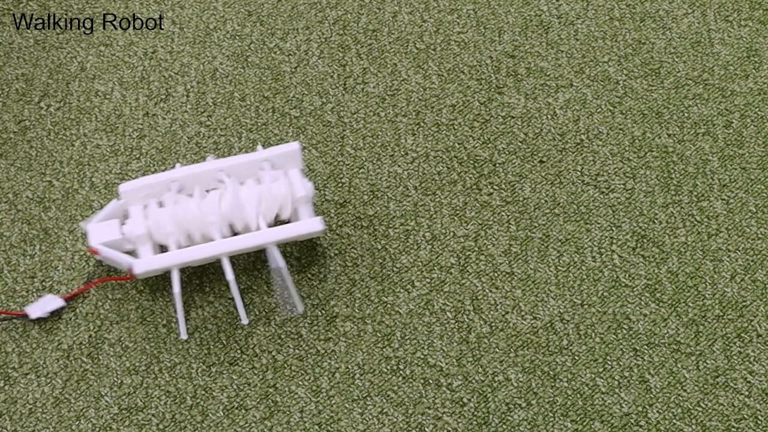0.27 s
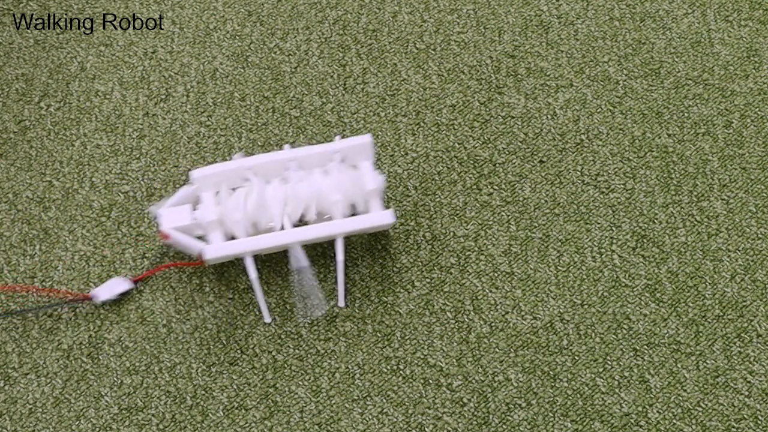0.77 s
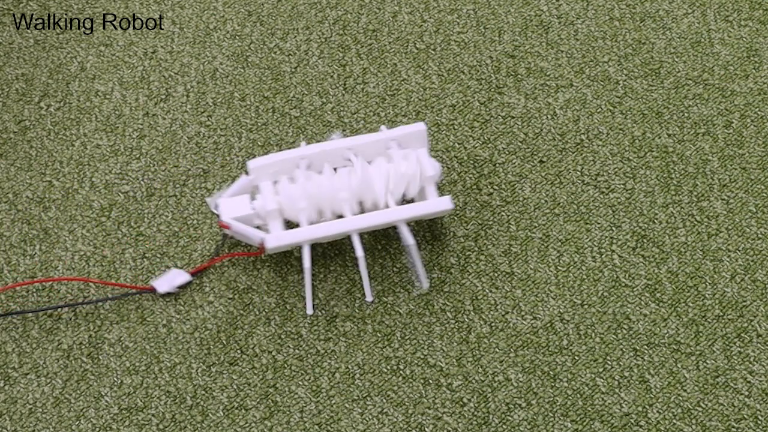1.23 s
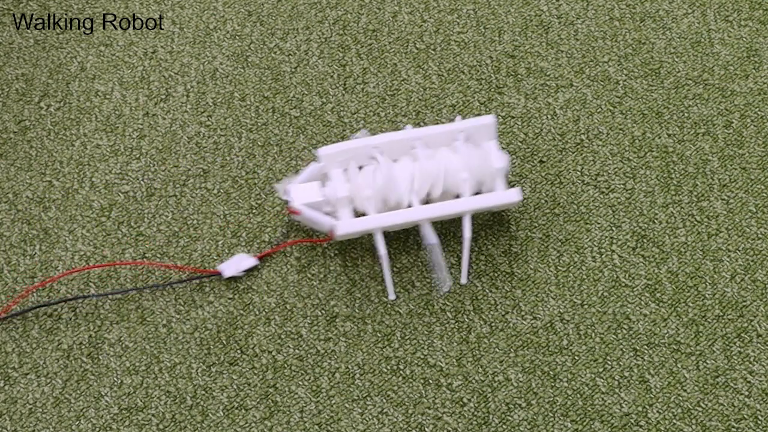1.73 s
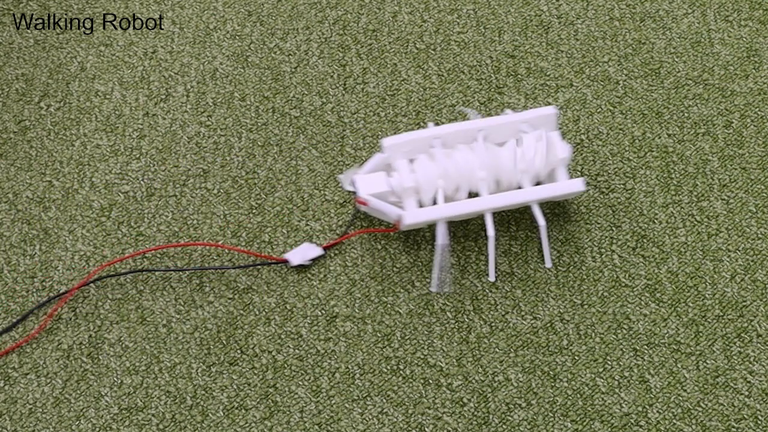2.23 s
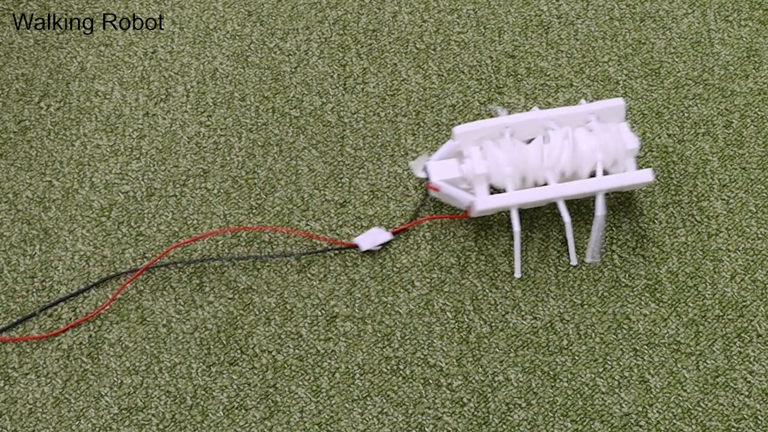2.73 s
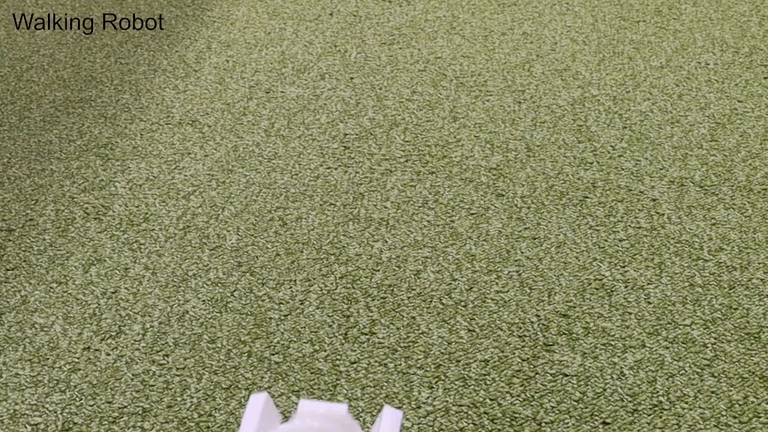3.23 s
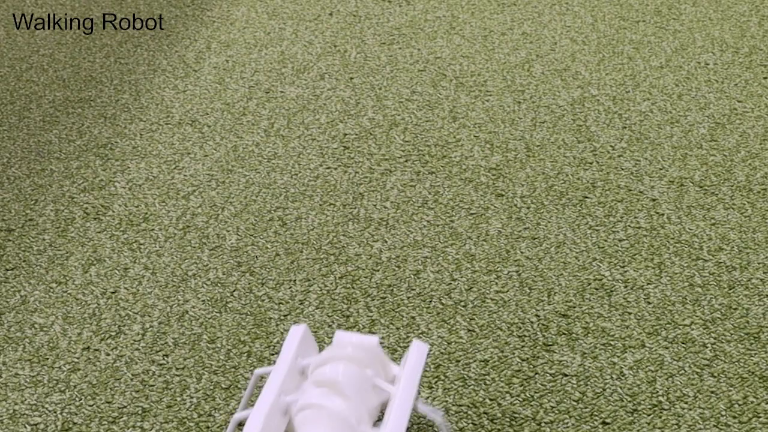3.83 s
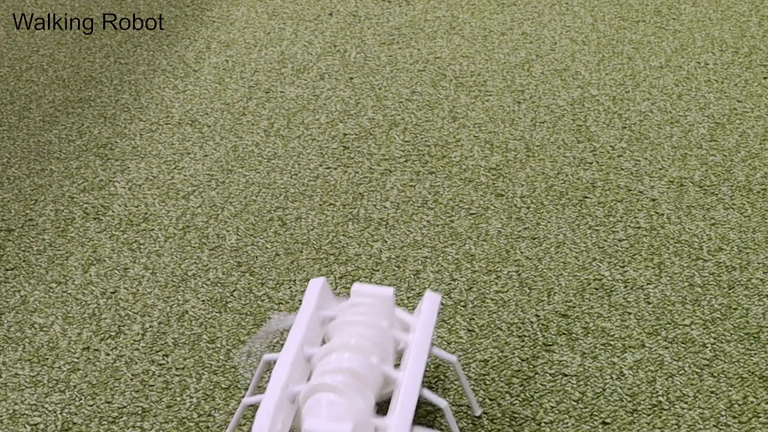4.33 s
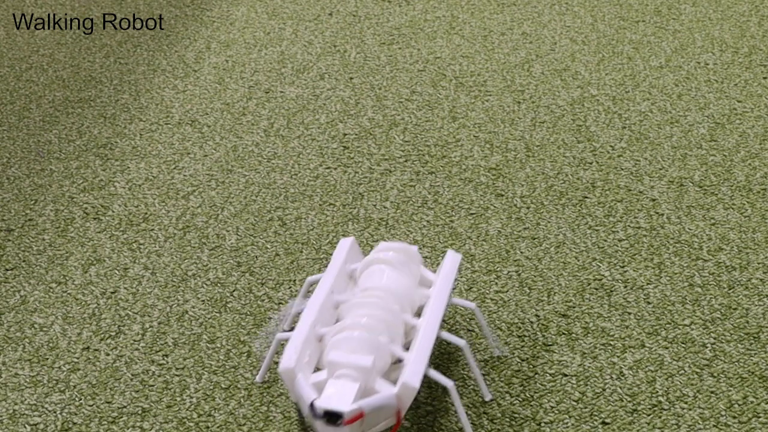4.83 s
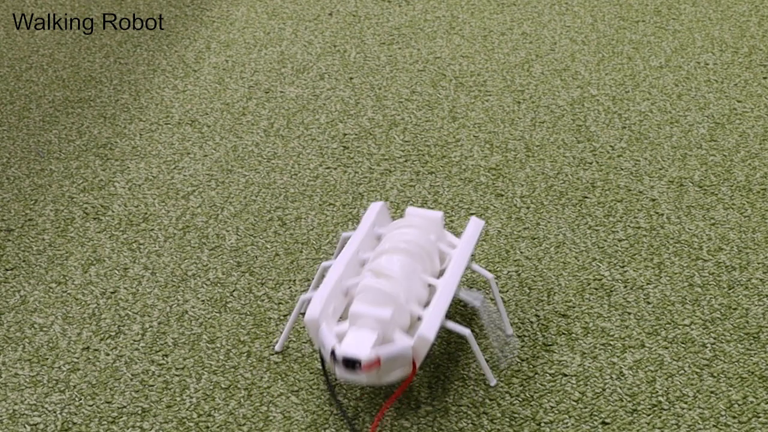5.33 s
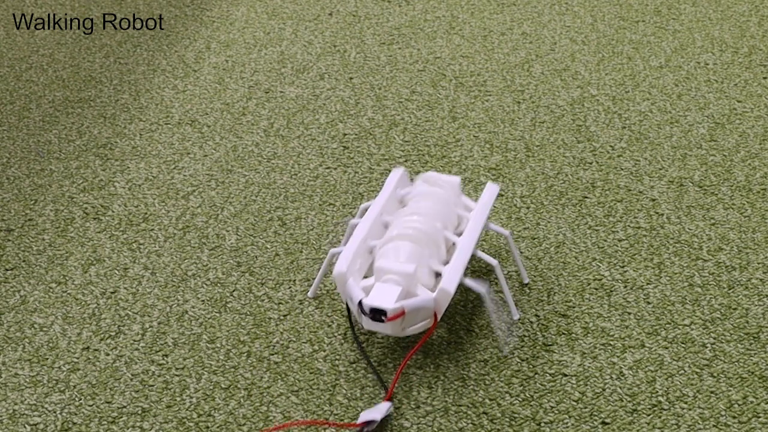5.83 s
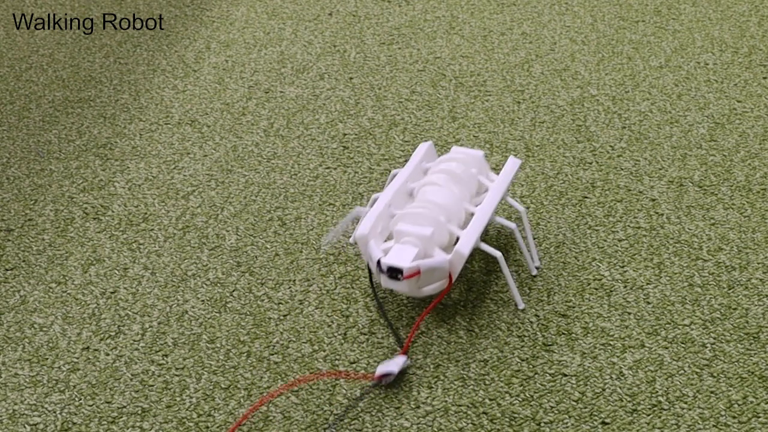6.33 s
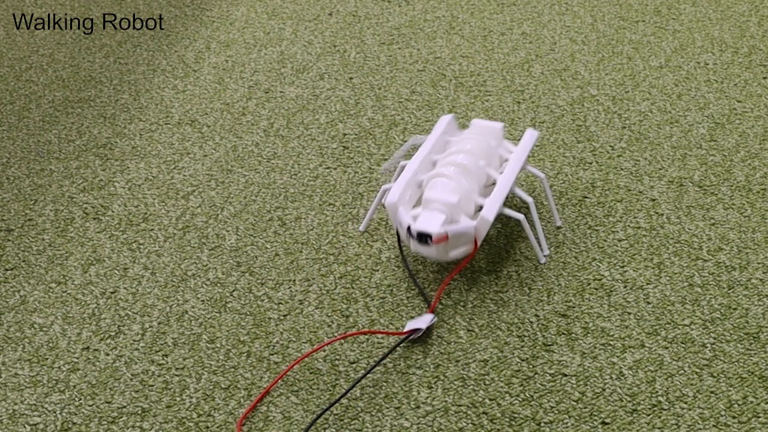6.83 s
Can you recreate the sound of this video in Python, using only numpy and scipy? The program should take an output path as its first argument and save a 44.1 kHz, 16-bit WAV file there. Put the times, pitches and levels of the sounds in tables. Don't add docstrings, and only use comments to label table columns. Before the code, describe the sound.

Rapid plastic clatter and a shrill gear whine pulse about three times a second in a quiet carpeted room, jumping louder midway.

```python
import sys
import numpy as np
from scipy import signal
from scipy.fft import rfft, irfft
from scipy.io import wavfile
from scipy.ndimage import uniform_filter1d, map_coordinates

SR = 44100
rng = np.random.default_rng(int(sys.argv[2]) if len(sys.argv) > 2 else 0)


def store_pcm(level_fs):
    pcm = np.round(np.clip(level_fs, -1, 1) * 32767).astype(np.int16)
    wavfile.write(sys.argv[1], SR, np.atleast_2d(pcm).T)


def elevation(decibels):
    levels = np.asarray(decibels, float)
    return 10 ** (levels / 20)


N = 312669
CHANGE_S = 3.013


def level(x, db):
    return x * elevation(db) / np.sqrt(np.mean(x ** 2))


def colour(x, points, lo_hz, hi_hz):
    hz = np.maximum(np.fft.rfftfreq(4096, 1 / SR), 5.)
    at_hz, db = np.transpose(points)
    edges = 1 / np.sqrt((1 + (lo_hz / hz) ** 8) * (1 + (hz / hi_hz) ** 8))
    gain = elevation(np.interp(np.log(hz), np.log(at_hz), db)) * edges
    cepstrum = irfft(np.log(gain + 1e-5))
    cepstrum[1:2048] *= 2
    cepstrum[2049:] = 0
    return signal.fftconvolve(x, irfft(np.exp(rfft(cepstrum))))[:N]


def band(x, hz, width_hz):
    edges_hz = [hz - width_hz / 2, hz + width_hz / 2]
    return level(signal.sosfilt(signal.butter(2, edges_hz, "band", fs=SR, output="sos"), x), 0)


def wander(rate):
    hold = max(int(SR / rate), 21)
    steps = rng.standard_normal(N // 20)[np.arange(N) // hold]
    return level(uniform_filter1d(uniform_filter1d(steps, hold), hold), 0)


def bump(place, share, length):
    away = (place - share + .5) % 1 - .5
    return np.exp(-(away / (length / 2)) ** 4)


def swells(place, events):
    return sum(np.outer(db, bump(place, at, length)) for at, length, *db in events)


def air():
    # (frequency [Hz], level per Hz [dB])
    rumble = [(15, -46), (25, -19), (69, -14), (96, -14.5), (130, -16.5), (186, -9), (355, -4), (452, -9),
              (549, -2.5), (900, -6), (1170, -10), (1980, -120)]
    # (frequency [Hz], level [dB], change in the rear view [dB])
    hums = [
        (48.5, -71.5, 1.5),
        (101, -65, 2),
        (189, -59, -9),
        (256.5, -60, -34),
    ]
    rumble_db = -47
    t = np.arange(N) / SR
    mid, side = (colour(rng.standard_normal(N), rumble, 15, 1070) for _ in range(2))
    side = colour(side, [(25, -14), (50, -10), (100, 7), (250, -3.0), (700, 2.5)], 10, 2000)
    hum = 0
    for hz, db, later_db in hums:
        hum_db = db + 1.5 + later_db * (t > CHANGE_S) + 0.69 * wander(5.13)
        hum = hum + elevation(hum_db) * np.sin(2 * np.pi * hz * t + 0.28 * wander(4.5))
    return level(mid, rumble_db) + hum + level(side, rumble_db - 8.0) * np.array([[1], [-1]])


def room(x):
    t60_s, room_db = .07, -3
    t = np.arange(SR // 3) / SR
    decay = np.exp(-np.log(1000) * t / t60_s)
    tail = rng.standard_normal((2, len(t))) * decay * (t > .0003)
    tail = tail / np.sqrt(np.sum(tail ** 2, axis=1, keepdims=True))
    paths = [map_coordinates(x, [np.arange(N) - 70 - 24 * wander(4)], order=3) for _ in range(2)]
    return elevation(room_db) * signal.fftconvolve(np.array(paths), tail, axes=1)[:, :N]


def knocks():
    # (time [s], peak level [dB], ring frequency [Hz])
    hits = [(0.3621, -15, 2890), (0.6448, -13, 3520), (0.6807, -24, 3650), (0.9941, -14, 3640),
            (1.1159, -11, 5600), (1.3099, -22, 3120), (1.6247, -20, 2990), (1.7075, -13, 3480),
            (1.7918, -19, 4070), (2.023, -13, 2830), (2.8898, -28, 1460), (2.9207, -30, 4060),
            (3.0145, -25, 1460), (3.05, -11, 3660), (3.1278, -16, 3520), (3.1746, -7, 5500),
            (3.213, -10, 4180), (3.322, -12, 2620), (3.4408, -6, 4230), (3.48, -6, 3530),
            (3.5023, -15, 4170), (3.5443, -8, 5500), (3.5987, -6, 2650), (3.6336, -5, 2520),
            (3.6745, -22, 2440), (3.8367, -11, 4200), (3.9868, -25, 1410), (4.0683, -11, 1490),
            (4.127, -22, 4100), (4.1976, -21, 5430), (4.3545, -21, 2620), (4.4242, -7, 3710),
            (4.5346, -19, 3120), (4.5705, -22, 2640), (4.6153, -10, 4070), (4.6907, -4, 3400),
            (4.7172, -16, 4150), (4.7496, -15, 3940), (4.775, -7, 4130), (4.8469, -9, 2760),
            (4.883, -18, 2560), (4.9262, -10, 3670), (5.008, -9, 1470), (5.0634, -13, 4000),
            (5.1602, -11, 3080), (5.1975, -11, 2640), (5.239, -10, 3600), (5.3794, -17, 4200),
            (5.471, -15, 2980), (5.6914, -17, 4050), (5.7144, -7, 4130), (5.8202, -22, 2760),
            (6.028, -15, 4190), (6.0831, -19, 4380), (6.1005, -17, 4200), (6.2542, -17, 1500),
            (6.4901, -16, 1470), (6.6009, -15, 4210), (6.7241, -18, 2670), (6.928, -8, 4160)]
    knock_db, ring_s = -5.5, .0025
    crack_db, crack_s = -1, .0007
    at_s, db, hz = np.transpose(hits)[:, :, None]
    t = np.arange(512) / SR
    crack = rng.standard_normal((len(hits), len(t))) * np.exp(-t / crack_s)
    ring = np.sin(2 * np.pi * hz * t) * np.exp(-t / ring_s)
    out = np.zeros(N + len(t))
    places = (at_s * SR).astype(int) + np.arange(len(t))
    np.add.at(out, places, elevation(db + knock_db) * (ring + elevation(crack_db) * crack))
    return signal.sosfilt(signal.butter(3, [1050, 10000], "band", fs=SR, output="sos"), out[:N])


def snaps(table, turn_s, first_s):
    share, db = np.transpose(table)
    turns = np.arange(-1, N / SR / turn_s)[:, None]
    late, harder = rng.standard_normal((2, len(turns), len(share)))
    at = ((first_s + (turns + share) * turn_s + 0.0014 * late) * SR).astype(int)
    inside = (at >= 0) & (at < N)
    blows = np.zeros(N)
    blows[at[inside]] = elevation(db + 1.5 * harder)[inside]
    decay = np.exp(-1 / (0.0012 * SR))
    return signal.lfilter([1], [1, -decay], blows) * rng.standard_normal(N) / 3


def rattle(body, rings, blows, frame_db, cam_db, slide_db, leg_db, fine_db):
    happens, sign, size = rng.random((N, 3)).T
    size_db = np.minimum(-3.0 * np.log(size + 1e-9), 10)
    ticks = (happens < 1200 / SR) * np.sign(sign - .5) * elevation(size_db)
    judder = elevation(np.clip(1.6 * wander(90), -4, 4))
    ticks = level(ticks, 0) * judder + blows
    # (level [dB], low edge [Hz], high edge [Hz], rubbing against ticks [dB])
    regions = (
        (0.55 * frame_db, 900, 1900, -1.5),
        (0.47 * cam_db, 1900, 4500, -1.5),
        (slide_db, 4500, 9800, 1.5),
        (leg_db, 9800, 13400, .6),
        (fine_db, 13400, 17000, .6),
    )
    out = 0
    for db, lo_hz, hi_hz, rub_db in regions:
        rub = elevation(rub_db) * judder * rng.standard_normal(N)
        out = out + colour((ticks + rub) * elevation(db + .4 * wander(20)), body, lo_hz, hi_hz)
    for hz, width_hz, db, frame, cam, leg in rings:
        shaken = ticks + 1.2 * judder * rng.standard_normal(N)
        shake_db = frame * frame_db + cam * cam_db + leg * leg_db
        out = out + elevation(db) * band(shaken * elevation(shake_db), hz, width_hz)
    return out


def whine(tooth_hz, first_db, second_db, third_db, shell_db, beat_db, rough):
    wheel_teeth = 35
    beat = .268
    teeth = np.cumsum(tooth_hz * (1 + .004 * wander(40) + .007 * wander(500))) / SR
    wheel = 2 * np.pi * teeth / wheel_teeth + 0.087 * wander(41)
    swell = np.sin(wheel) - 0.75 * np.sin(2 * wheel)
    # (multiple of the tooth rate, level [dB], throb depth, grit)
    orders = (
        (1, first_db + 3.7, .15, .3),
        (2, second_db + 2.5, .35, .2 * rough),
        (3, third_db + 3.5, .6, .4),
        (4, third_db - 20, .6, .9),
        (2 + beat, second_db + beat_db[0], .4, .4 * rough),
        (3 - beat, third_db + beat_db[1], .5, .6),
        (3 + beat, third_db + beat_db[2], .5, .5),
    )
    out = elevation(shell_db + 0.5) * band(rng.standard_normal(N), 5430, 390)
    for order, db, depth, grit in orders:
        throb = 1 + depth * swell + .2 * wander(200) + grit * wander(1500)
        out = out + elevation(db + 0.57 * wander(25.11)) * throb * np.sin(2 * np.pi * order * teeth)
    return out


def two_ports(direct, pan_db, lag):
    low, under = (signal.sosfiltfilt(signal.butter(2, hz, fs=SR, output="sos"), direct) for hz in (3400, 10000))
    # (band, share of the bearing, lean to the left [dB])
    bands = ((low, .1, -2), (under - low, .6, -.3), (direct - under, 1.3, 0.7))
    ports = []
    for side in (1, -1):
        heard = sum(elevation(side * (share * pan_db + lean_db)) * x for x, share, lean_db in bands)
        ports.append(map_coordinates(heard, [np.arange(N) - side * lag / 2], order=3))
    return np.array(ports)


def robot(tones_db, shell_swell_db, grit, mesh, shake, walk, bearing, body, snap, turn_s, first_s,
          rattle_db, rings, speed, slides, beat, beat_db, octave_db):
    free_hz, stall_hz = 4300, 3770
    wet_share = 0.29
    t = np.arange(N) / SR
    place = np.arange(720) / 720
    first, second, shell = tones_db

    tooth_hz = np.interp(place, *np.transpose(speed), period=1)
    load = (free_hz - tooth_hz) / (free_hz - stall_hz)
    first, second, third = np.array([[first], [second], [-40]]) + swells(place, mesh)
    frame, cam, leg = np.array([[-3.1], [-3.1], [-3]]) + swells(place, shake)
    third = third + 14.5 * load
    landing = 4.2 * bump(place, 0.93, 0.038)
    leg = leg + 5 * load + landing
    slide = -2.5 + swells(place, slides)[0]
    shell = shell + shell_swell_db * bump(place, 0.59, 0.43)
    upper = beat_db[0] + swells(place, beat)[0]

    curves = (tooth_hz, first, second, third, shell, frame, cam, slide, leg, upper, load)
    every_turn = [np.interp((t - first_s) / turn_s, place, curve, period=1) for curve in curves]
    tooth_hz, first, second, third, shell, frame, cam, slide, leg, upper, load = every_turn

    (nearest_s, span_s), *beams = walk
    loss_db = 10 * np.log10(1 + ((t - nearest_s) / span_s) ** 2)
    mid_db, top_db, near_db, fine_db, twice_db = (db - share * loss_db for db, share in beams)

    beats = (upper, beat_db[1] - 8 * load, beat_db[2])
    tones = whine(tooth_hz, first + near_db, second + twice_db + octave_db, third + top_db,
                  shell + near_db, beats, grit)
    parts = rattle(body, rings, snaps(snap, turn_s, first_s), frame, cam,
                   slide_db=1.26 * slide + mid_db - near_db,
                   leg_db=0.57 * leg + top_db - near_db,
                   fine_db=1.4 * leg + fine_db - near_db)
    direct = tones + elevation(rattle_db + near_db) * parts
    pan_db = bearing[0] + bearing[1] * (t - first_s)
    lag = bearing[2] + bearing[3] * (t - first_s)
    return two_ports(direct, pan_db, lag) + room(direct * elevation(wet_share * loss_db))


def side_view():
    # (frequency [Hz], level per Hz [dB])
    body = [(410, -45), (700, -7), (1150, -4.5), (1520, -1), (1810, -3.5), (2880, -1), (3500, 0),
            (4090, -1.5), (4800, -3.5), (5810, -2), (8250, 1), (9300, -4), (10200, -1), (12500, 2),
            (14100, -7.5), (15600, -15)]
    # (share of turn, tooth rate [Hz])
    speed = [(.0, 3735), (.035, 4024), (.1, 3972), (.14, 4187), (.19, 4074), (.25, 4212), (.35, 4281),
             (.41, 4074), (.5, 4152), (.58, 4108), (.65, 4117), (.685, 4242), (.74, 4093), (.79, 4036),
             (.825, 3747), (.88, 3725), (.95, 3847), (.985, 3716)]
    # (share of turn, length share, tooth tone [dB], second [dB], third [dB])
    mesh = [(.07, 0.05, 1, 8, 4), (0.161, 0.042, -5, 10, -3), (.22, 0.072, 0.5, 3, 0),
            (.31, 0.09, 3, 5, -16), (.39, 0.081, 6.5, 10.5, 1), (.54, 0.23, 5.5, 8.5, 6.5),
            (.75, 0.15, 5, 7, 11.5), (.89, 0.24, 3.5, 5.5, 2.5), (.01, 0.065, -1, -23, -12)]
    # (share of turn, length share, frame [dB], cam [dB], leg scratch [dB])
    shake = [(.01, 0.031, 4, -2.5, -6), (.05, 0.12, 2, 3.5, 4), (.12, .04, 0, 2, -5),
             (.15, 0.041, 4, 5.5, 6), (.23, 0.09, 2, 5.5, -1.5), (.31, 0.055, 1.5, -3, 5),
             (.47, 0.056, -3, -0.5, -2), (.6, 0.12, -4, -1, -1.5), (.75, 0.12, 2.5, 1, 2.5),
             (.84, 0.062, 6.5, 8, 4), (.95, 0.088, 6, 6, 2.5), (.39, .03, 1, -4, 6),
             (.485, .02, -2, 2.5, 9), (.535, .02, -5, -2, 7.5), (.585, .02, 6.5, 3, -1.5),
             (.44, .04, -4, -1.5, -3), (.69, .04, 3, -7.5, 3)]
    # (share of turn, level [dB])
    snap = [(.005, 13), (.125, 11), (.16, 14), (.205, 14), (.22, 13), (.4, 10), (.475, 11), (.52, 10),
            (.7, 12), (.725, 11), (.81, 13), (.845, 14), (.955, 16)]
    # (share of turn, length share, level [dB])
    slides = [(.0, 0.024, 6), (.055, 0.076, 3), (.16, .04, 0.5), (.4, 0.44, 2.5), (.6, .1, 2.5),
              (.85, 0.063, -1.5), (.97, 0.025, 2)]
    # (share of turn, length share, level [dB])
    beat = [(.05, .06, 5), (.4, .05, -4.5), (.55, .15, 3), (.88, .2, -1.5)]
    # (frequency [Hz], width [Hz], level [dB], share of frame shake, of cam shake, of leg scratch)
    rings = [
        (1505, 240, -24, 1, 0.59, 0),
        (1320, 160, -41, 0.9, 0, 0),
        (2890, 190, -28, 0, 1.5, 0.25),
        (3520, 380, -29, 0.42, 1.4, 0),
    ]
    # (level nearest [dB], share of loss)
    walk = [
        (2.64, 1.2),
        (0.76, 0.37),
        (0.4, 1.03),
        (1.16, 0.033),
        (1.6, 0.21),
        (2.4, 0.88),
    ]
    bearing = (4, -2, -1.71, 1.32)
    return robot((-42.5, -37, -53), 8.5, 1.4, mesh, shake, walk, bearing, body, snap,
                 turn_s=.31637, first_s=.06, rattle_db=-23.5, rings=rings, speed=speed, slides=slides,
                 beat=beat, beat_db=(-8, -6, -5.5), octave_db=1.0)


def rear_view():
    # (frequency [Hz], level per Hz [dB])
    body = [(410, -46), (700, -6), (980, -10.5), (1350, 1), (1950, -3), (2700, 0), (3400, -1), (4150, -1.5),
            (4800, -5), (6100, -9.5), (7000, -5), (9000, -6.5), (10500, -3.5), (12600, -3), (14200, -10.5),
            (15600, -18.5)]
    # (share of turn, tooth rate [Hz])
    speed = [(.01, 3640), (.04, 4093), (.11, 4055), (.155, 4168), (.2, 4080), (.28, 4330), (.36, 4350),
             (.41, 4108), (.46, 4195), (.57, 4190), (.66, 4343), (.73, 4190), (.78, 4113), (.825, 3803),
             (.89, 3797), (.96, 3849), (.985, 3686)]
    # (share of turn, length share, tooth tone [dB], second [dB], third [dB])
    mesh = [(.07, 0.028, 1.5, -0.5, 6.5), (.165, 0.035, 8, -7, 8.5), (.225, 0.058, 8.5, 2, -9),
            (.32, .1, 2, 5.5, -4), (0.402, 0.064, 10.5, 6, 3), (.47, 0.053, 3.5, -1, 1),
            (.52, .17, 6, 4.5, 5), (.73, 0.22, 5.5, 0.5, 2), (.89, 0.27, 0, 3.5, 1.5),
            (.01, 0.032, -7, -4, -29)]
    # (share of turn, length share, frame [dB], cam [dB], leg scratch [dB])
    shake = [(.01, 0.054, 6, 6.5, -11), (.05, 0.18, -0.5, -2, -0.5), (.115, .035, 2, 1.5, -2.5),
             (.15, 0.029, 2, 5, 3.5), (0.217, 0.055, 5.5, 7.5, -3.5), (.31, .08, -1.5, 2.5, 4.5),
             (.38, 0.052, -2.5, -7, 3.5), (.45, 0.11, 0.5, 2.5, 4.5), (.54, 0.12, -1.5, 4, 0.5),
             (.64, 0.028, 5, 5.5, 7.5), (0.732, 0.1, 3.5, 6, -0.5), (0.829, 0.078, 8.5, 10, 1.5),
             (.93, .1, 3.5, 6, 0.5), (.395, .035, -2, 0.5, 3.5), (.485, 0.022, 6.5, -3.5, -2),
             (.53, .02, 1, 1, 4), (.58, .02, -1, -6.5, 5.5), (.445, 0.034, -8.5, -4.5, -13),
             (.74, 0.11, 2.5, 1.5, 6.5)]
    # (share of turn, level [dB])
    snap = [(.05, 10), (.125, 11), (.148, 11), (.195, 15), (.208, 15), (.245, 13), (.35, 11), (.38, 12),
            (.466, 14), (.52, 11), (.56, 10), (.594, 10), (.698, 16), (.75, 14), (.786, 12), (.814, 16),
            (.84, 15), (.95, 16), (.975, 13)]
    # (share of turn, length share, level [dB])
    slides = [(.06, 0.035, 2), (.2, 0.012, 6.5), (.235, 0.015, 3.1), (.335, 0.088, 2.6), (.47, 0.034, 2.8),
              (.59, .1, 2), (.7, .03, 5.4), (.98, 0.015, 6.9)]
    # (share of turn, length share, level [dB])
    beat = [(.05, 0.064, 14), (.15, .06, 6), (.52, 0.24, 4.5), (.77, .1, 5), (.9, 0.23, -24)]
    # (frequency [Hz], width [Hz], level [dB], share of frame shake, of cam shake, of leg scratch)
    rings = [
        (1490, 140, -20, 0.86, 0.5, 0),
        (1340, 130, -24, 1.4, 0.5, 0),
        (2730, 460, -17.5, 0.32, 1.5, 0.62),
        (2955, 240, -25, 0, 1.5, 0.8),
        (3500, 220, -26.5, 0, 0.5, 0),
        (11600, 330, -20.5, 0.24, -3, .6),
    ]
    # (level nearest [dB], share of loss)
    walk = [
        (4, 1.55),
        (1.1, -0.0039),
        (3, 0.96),
        (0.5, 0.38),
        (4, 0.28),
        (1, 0.31),
    ]
    bearing = (.2, -0.35, -0.62, 0.53)
    return robot((-39, -40, -48), 15, 3, mesh, shake, walk, bearing, body, snap,
                 turn_s=.31298, first_s=3.065, rattle_db=-19.5, rings=rings, speed=speed, slides=slides,
                 beat=beat, beat_db=(-3, -1, -4.5), octave_db=3.5)


def scene():
    side, rear = side_view(), rear_view()
    knock = knocks()
    change = np.clip((np.arange(N) / SR - CHANGE_S) / .004, 0, 1)
    walker = side * (1 - change) + rear * change
    return walker + knock + elevation(-4) * room(knock) + air()


def top_cut(x):
    return signal.sosfilt(signal.butter(12, 15740, fs=SR, output="sos"), x)


def record(dry):
    top_hz = 15700
    rounded = np.tanh(dry)
    mix = signal.sosfilt(signal.ellip(8, .3, 60, top_hz, fs=SR, output="sos"), rounded)
    return top_cut(mix)


dry = scene()
out = record(dry)
store_pcm(out)
```